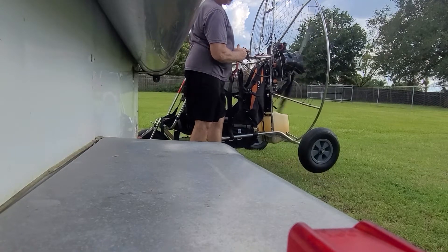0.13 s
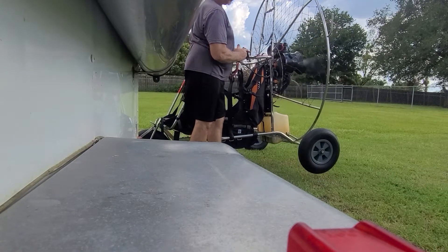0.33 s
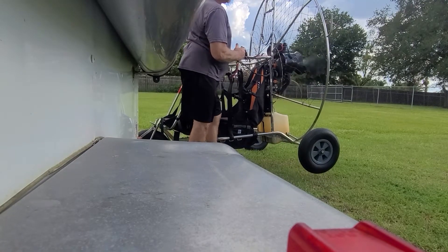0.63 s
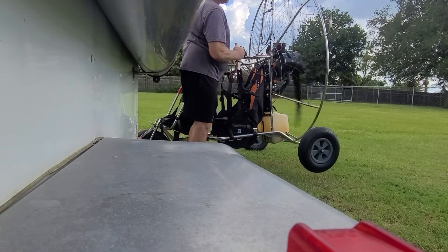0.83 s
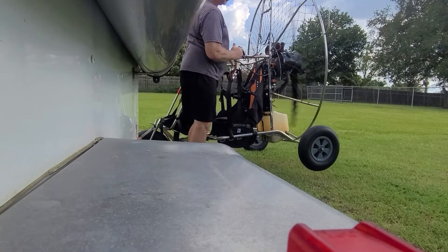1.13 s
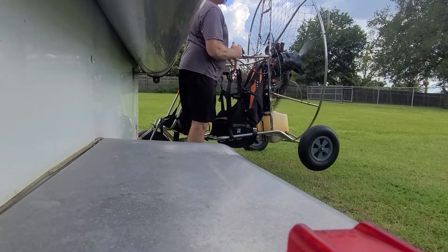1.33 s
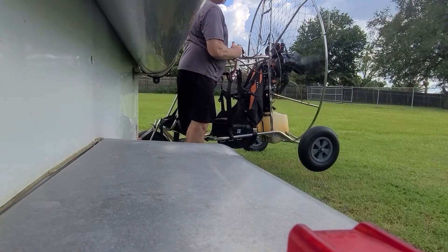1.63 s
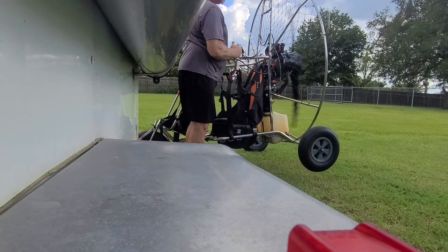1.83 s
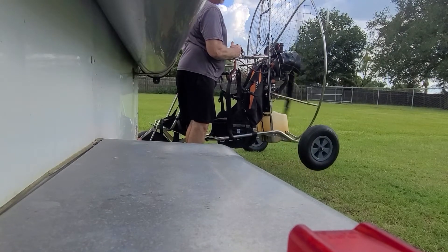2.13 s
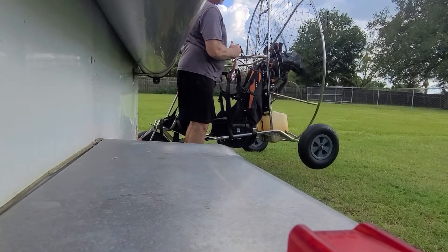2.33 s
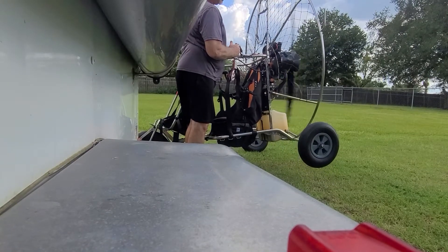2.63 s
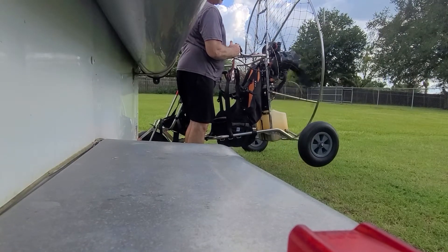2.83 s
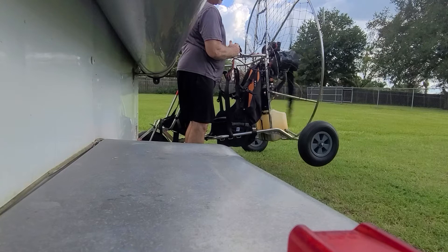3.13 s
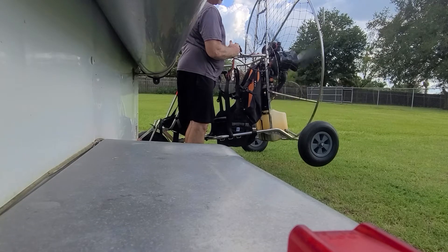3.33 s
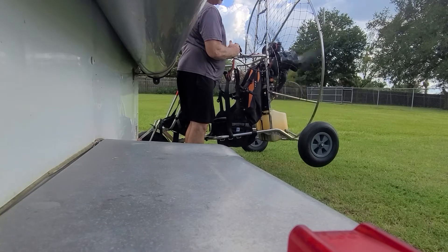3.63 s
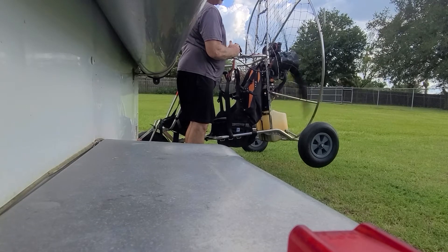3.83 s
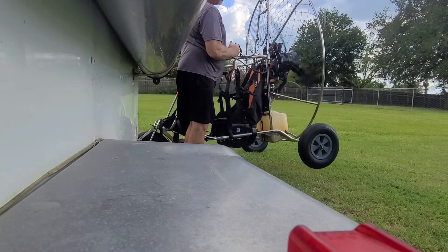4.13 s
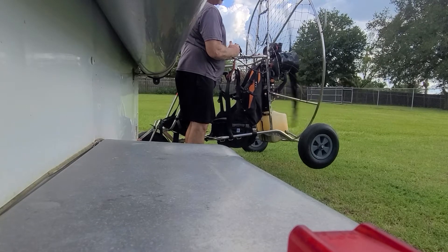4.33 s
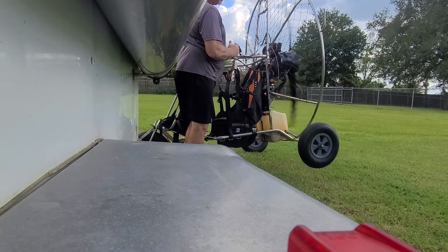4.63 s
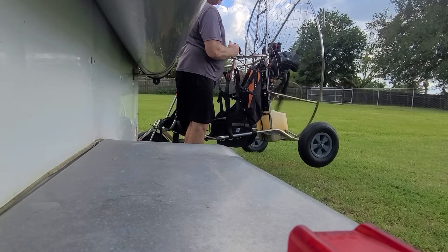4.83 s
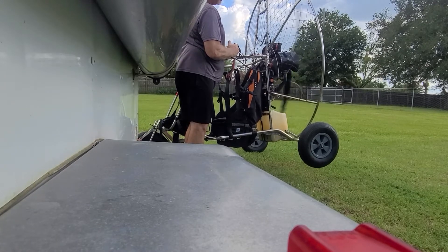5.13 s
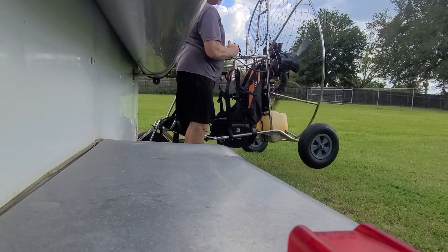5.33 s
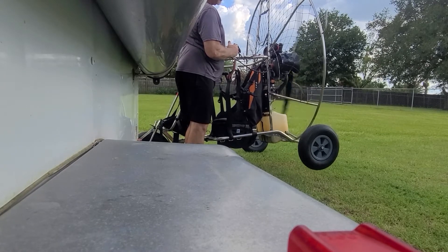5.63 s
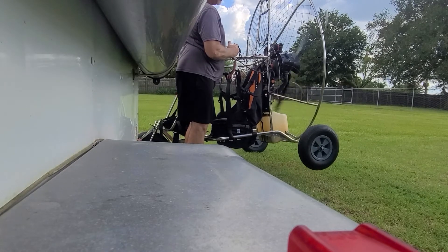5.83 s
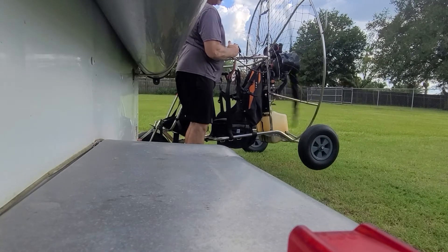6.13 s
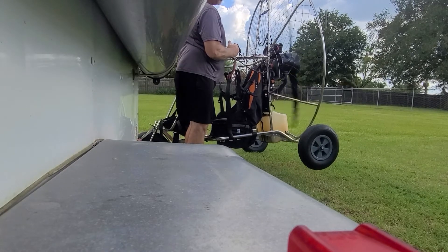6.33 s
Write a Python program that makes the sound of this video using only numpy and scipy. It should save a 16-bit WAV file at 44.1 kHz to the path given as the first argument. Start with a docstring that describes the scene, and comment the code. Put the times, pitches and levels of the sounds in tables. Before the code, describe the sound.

Close, loud paramotor engine held at high power on open grass, a harsh constant buzzing drone with propeller chop, hiss and metallic rattle.

```python
"""On a grass field, a paramotor trike runs at steady high power a few metres away, heard at two ports.
The two-stroke fires about 127 times a second and rings its exhaust pipe: a sum of wavering harmonics.
The belt-driven three-blade propeller chops the air slightly slower, so the two harmonic series beat.
Coloured noise makes the slipstream's rush and the hiss, both pulsing with each firing;
each firing also knocks the metal, whose rattle is an impulse train through a short diffuse ring."""
import sys
import numpy as np
from scipy import signal
from scipy.fft import rfft, irfft
from scipy.io import wavfile

SR = 44100
rng = np.random.default_rng(int(sys.argv[2]) if len(sys.argv) > 2 else 0)


def put_to_file(sound):
    """Save the sound as 16-bit audio at rate SR, in the file named by the first command-line argument."""
    columns = np.atleast_2d(sound).T  # one column per channel
    safe = np.clip(columns, -1, 1)
    whole_steps = np.round(safe * 32767)
    wavfile.write(sys.argv[1], SR, whole_steps.astype(np.int16))


N = 285327

# engine speed, drifting slightly at a held throttle: (time [s], firing rate [Hz])
ENGINE_SPEED = [(0.0, 126.7), (0.83, 127.2), (1.09, 127.3), (1.37, 128.1), (1.94, 127.4), (2.68, 128.8),
                (3.18, 128.31), (3.83, 126.53), (4.65, 127.4), (5.25, 126.49), (5.93, 125.9), (6.47, 125.1)]


def undb(db):
    """Level as a logarithm of amplitude: 20 dB is a tenfold gain."""
    return 10 ** (np.asarray(db) / 20)


def colour(white, spectrum):
    """Linear filtering: noise of rms 1 takes the left and right spectral densities of a table."""
    hz, *sides_db = np.transpose(spectrum)
    log_hz = np.log(np.maximum(np.fft.rfftfreq(N, 1 / SR), 1))
    density_db = [np.interp(log_hz, np.log(hz), side) for side in sides_db]
    # white noise of rms 1 spreads its power over SR / 2 hertz
    return irfft(rfft(white) * undb(density_db), N) * np.sqrt(SR / 2)


def walk(rate):
    """Low-passed noise: smooth random motion, about rate new values a second, standard deviation 1."""
    size = 1024
    hz = np.fft.rfftfreq(size, N / SR / size)
    spectrum = rfft(rng.standard_normal(size)) / (1 + (2 * hz / rate) ** 2)
    slow = irfft(spectrum)
    return np.interp(np.linspace(0, size - 1, N), np.arange(size), slow / slow.std())


def causal_phase(db):
    """Minimum phase: in a passive resonator the harmonic levels fix the phases by a Hilbert transform."""
    log_gain = np.log(undb(np.r_[db[0], db]))
    mirrored = np.r_[log_gain, log_gain[-2:0:-1]]
    return -signal.hilbert(mirrored).imag[1:len(db) + 1]


def crank(wobble=0.0011):
    """Phase is the integral of frequency; uneven combustion pushes it ahead and behind (wobble [turns])."""
    s, hz = np.transpose(ENGINE_SPEED)
    firing_hz = np.interp(np.arange(N) / SR, s, hz)
    return np.cumsum(firing_hz) / SR + wobble * walk(37)


def puffs(turns, depth, lead):
    """Periodic amplitude modulation: a swell once a turn as the exhaust port opens; rms 1, lead [turns]."""
    gate = np.exp(depth * np.cos(2 * np.pi * (turns + lead)))
    return gate / np.sqrt(np.mean(gate ** 2))


def pair_noise(apart_hz, lag_s=0.000296):
    """Spatial coherence: white noise alike in the bass, unrelated well above apart_hz, earlier on the left."""
    hz = np.fft.rfftfreq(N, 1 / SR)
    alike = 1 / (1 + (hz / apart_hz) ** 2)
    mid, side = rfft(rng.standard_normal((2, N)))
    sign = np.array([[1], [-1]])  # left, right
    ports = mid * np.sqrt((1 + alike) / 2) + sign * side * np.sqrt((1 - alike) / 2)
    return irfft(ports * np.exp(1j * np.pi * sign * hz * lag_s), N)


def slipstream(turns, sway_db=1.0):
    """Turbulence noise: random pressure in the air behind the propeller, shaken by every exhaust puff."""
    # rush of the slipstream: (frequency [Hz], left density [dB per Hz], right density [dB per Hz])
    rush = [(21.7, -82, -79), (86.5, -65, -68.5), (190, -65, -64.5), (325, -68.5, -66.5), (565, -61, -60),
            (750, -54, -57), (890, -67.5, -79), (1146, -58, -64.5), (1430, -63, -62), (1870, -81, -68.5),
            (2220, -84.5, -85.5), (4050, -100, -100)]
    turbulence = pair_noise(apart_hz=1310) * puffs(turns, depth=0.32, lead=0.052)
    return colour(turbulence, rush) * undb(sway_db * walk(3.8))


def hiss(turns, flicker_db=0.6, sway_db=-0.25):
    """Modulated broadband noise: fine hiss of gas and blade tips that surges with each firing."""
    # hiss of gas and blade tips: (frequency [Hz], left density [dB per Hz], right density [dB per Hz])
    hiss_spectrum = [(1500, -91, -104), (2540, -75.5, -100), (3370, -80.5, -88), (4100, -74.5, -71.5),
                     (5360, -70.5, -90), (6500, -74, -90.5), (7100, -76, -94), (8460, -64, -74.5),
                     (9000, -68.5, -69.5), (11460, -71, -83.5), (12000, -61, -66), (13500, -63.5, -81),
                     (15200, -69.5, -73)]
    level_db = flicker_db * walk(120) + sway_db * walk(4.9)
    strength = puffs(turns, depth=0.11, lead=0.027) * undb(level_db)
    return colour(pair_noise(apart_hz=8300) * strength, hiss_spectrum)


def fin(knocks, hz=4110, left_db=-47, right_db=-51, sway_db=2.93):
    """Damped resonance: one metal mode, struck by the knocks, stands out of the rattle as a rough whine."""
    decay_s = .0017
    pole = np.exp((2j * np.pi * hz - 1 / decay_s) / SR)
    whine = signal.lfilter([1], [1, -pole], knocks).imag
    level_db = np.array([[left_db], [right_db]]) + sway_db * walk(15)
    return undb(level_db) * whine / whine.std()


def rattle(turns, scatter_db=1.3, jitter_s=.000009, ring_s=0.0038, sway_db=1.5):
    """Impulse response: every firing knocks the same metal, which rings briefly by its own paths to each port."""
    # ring of the cylinder fins and frame:
    # (frequency [Hz], left density [dB per Hz], right density [dB per Hz])
    metal_spectrum = [(1660, -113, -110), (2420, -77.5, -80.5), (2810, -76, -81), (3300, -83.5, -87),
                      (3910, -74.5, -96), (4230, -74, -80), (4800, -69.5, -74), (4970, -78.5, -86),
                      (6420, -70, -78.5), (7020, -79.5, -87), (8400, -74.5, -77), (11900, -68.5, -75)]
    at = np.interp(np.arange(1, int(turns[-1])), turns, np.arange(N))  # firings, in samples
    chance = rng.standard_normal((len(at), 2))
    at = np.clip(at + jitter_s * SR * chance[:, 0], 0, N - 2)
    force = undb(scatter_db * chance[:, 1])
    # each knock is shared between the two samples nearest its moment
    whole, part = at.astype(int), at % 1
    knocks = np.zeros(N)
    knocks[whole] = force * (1 - part)
    knocks[whole + 1] = force * part
    t = np.arange(SR // 50) / SR
    paths = rfft(rng.standard_normal((2, len(t))) * np.exp(-t / ring_s))
    ring = irfft(paths / np.abs(paths))  # the paths spread the knock in time and leave its colour alone
    metal = signal.fftconvolve(knocks[None], ring, axes=1)[:, :N]
    return colour(metal / metal.std(), metal_spectrum) * undb(sway_db * walk(14)) + fin(knocks)


def propeller(turns, blade_lead=0.576, skew=0.72, gusty=0.039, plume=0.4, plume_lead=0.32,
              bite_db=1.22, unbalance_db=-53):
    """Blade-passing tone: each blade sends a lopsided pressure pulse, swaying with the gusty inflow.

    Leads [blade passes, turns] and skew [cycles] set phase; bite_db [dB per Hz] sharpens it with speed."""
    # propeller thrust tone: (multiple of the blade rate, level [dB])
    blade_harmonics = [(1, -20), (2, -22), (3, -30.5), (4, -35.5), (5, -58), (6, -44)]
    passes = turns * .99663  # blade passes per firing
    s, hz = np.transpose(ENGINE_SPEED)
    faster_hz = np.interp(np.arange(N) / SR, s, hz - hz.mean())
    # as the blades slip behind the crank, they now and then cut through a fresh puff, which blunts their pulse
    overlap = (np.cos(2 * np.pi * (passes - turns + plume_lead)) + 1) ** 2 / 4
    sharpness = 1 - plume * overlap
    sharpness = sharpness / sharpness.mean()
    tones = 0
    for k, (_, db) in enumerate(blade_harmonics, start=1):
        load = 1 + gusty * k * walk(21)
        if k > 1:
            load = load * sharpness
        gain = undb(db + bite_db * (k - 1) * faster_hz)
        tones = tones + gain * load * np.cos(2 * np.pi * (k * (passes + blade_lead) + skew))
    # the blades are not quite alike: a faint tone at twice the shaft rate
    shaft = passes / 3
    unbalance = undb(unbalance_db + 2 * walk(2.8)) * np.cos(4 * np.pi * shaft)
    return np.sqrt(2) * (tones + unbalance)


def exhaust(turns, waver_rate=13, port_lag=0.014):
    """Fourier series: firings ring the pipe; turbulent air on the way scatters each harmonic, which wavers."""
    # exhaust note as the pipe and silencer shape it: (multiple of the firing rate,
    # left level [dB], right level [dB], wavering part over steady part [ratio])
    pipe_harmonics = [(1, -21.5, -20, 0.12), (2, -33.5, -28.5, 0.33), (3, -35, -36.5, 0.44),
                      (4, -28, -29, 0.48), (5, -15.5, -16, 0.11), (6, -23, -21.5, 0.14),
                      (7, -36.5, -45, 0.64), (8, -45.5, -39.5, 1.0), (9, -27.5, -33.5, 0.42),
                      (10, -27.5, -34.5, 0.2), (11, -39.5, -30, 0.6), (12, -43, -46.5, 1.7),
                      (13, -42.5, -49.5, 3), (14, -44, -45, 0.65), (15, -53.5, -49.5, 1.2),
                      (16, -48.5, -54.5, 2.8)]
    orders, left_db, right_db, waver = np.transpose(pipe_harmonics)
    sides_db = np.array([left_db, right_db])
    phases = np.array([causal_phase(db) for db in sides_db])
    gains = np.sqrt(2) * undb(sides_db) * np.exp(1j * phases)
    ports = np.array([[1], [-1]]) * port_lag / 2  # in turns: the left port hears it first
    note = 0
    for i, k in enumerate(orders):
        scattered = (walk(waver_rate) + 1j * walk(waver_rate)) / np.sqrt(2)
        air = (1 + waver[i] * scattered) / np.hypot(1, waver[i])
        tone = air * np.exp(2j * np.pi * k * turns)
        at_ports = gains[:, i:i + 1] * np.exp(2j * np.pi * k * ports)
        note = note + (at_ports * tone).real
    return note


def scene():
    """Superposition: one crankshaft drives every layer, and their pressures add."""
    turns = crank()
    return slipstream(turns) + hiss(turns) + rattle(turns) + propeller(turns) + exhaust(turns)


def record(dry, ceiling=0.86):
    """Saturation and band limit: the highest peaks are rounded and the top above 15.7 kHz is cut."""
    rounded = dry / (1 + (dry / ceiling) ** 8) ** (1 / 8)
    low_pass = signal.ellip(12, .1, 90, 15700, fs=SR, output="sos")
    return signal.sosfilt(low_pass, rounded)


dry = scene()
out = record(dry)
put_to_file(out)
```